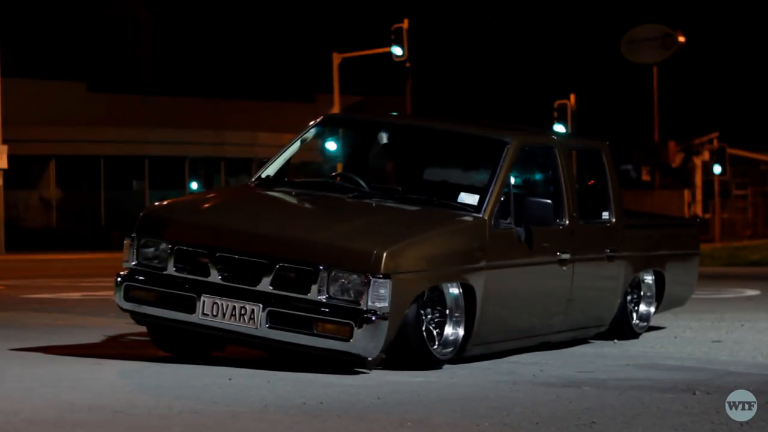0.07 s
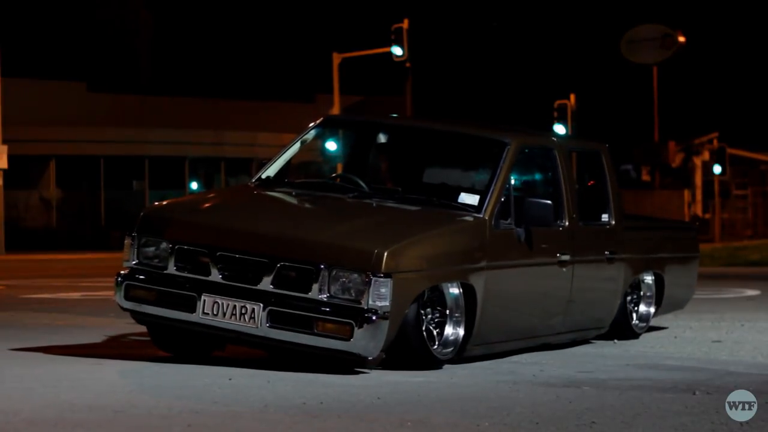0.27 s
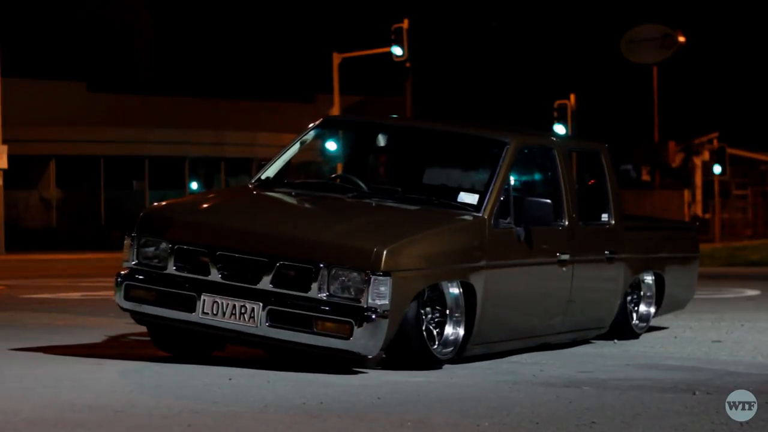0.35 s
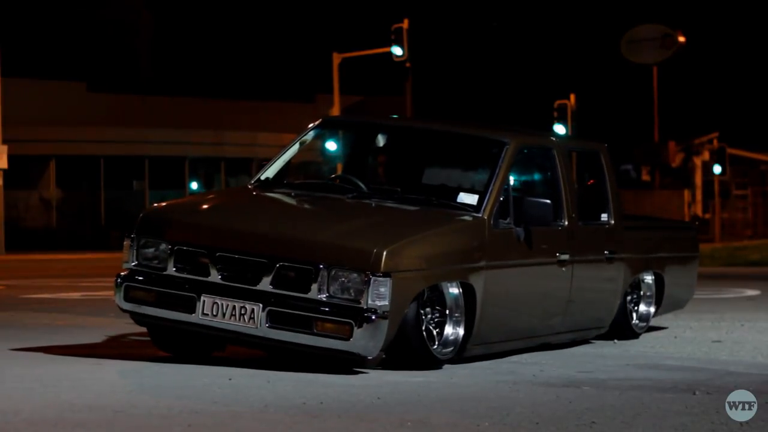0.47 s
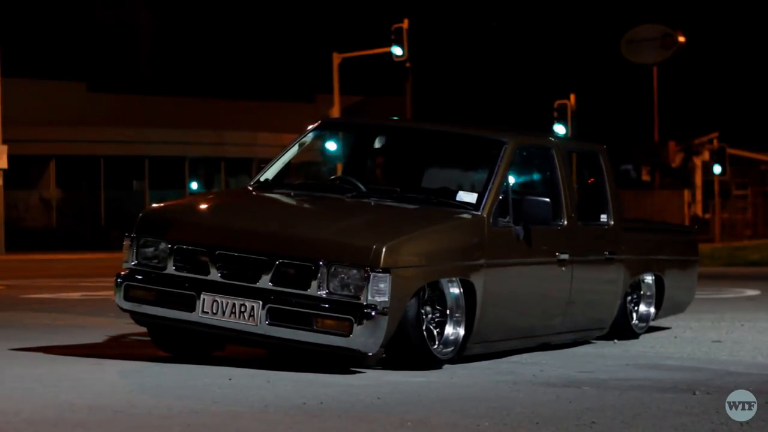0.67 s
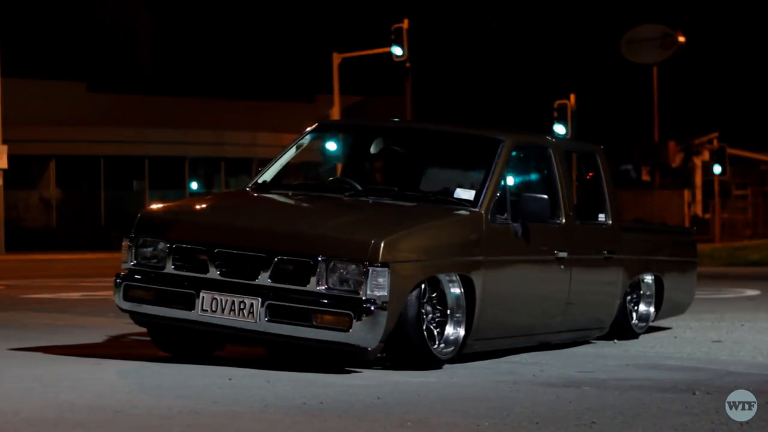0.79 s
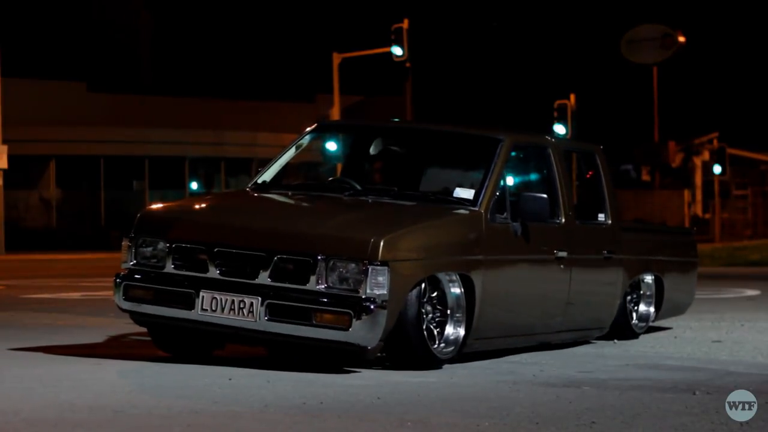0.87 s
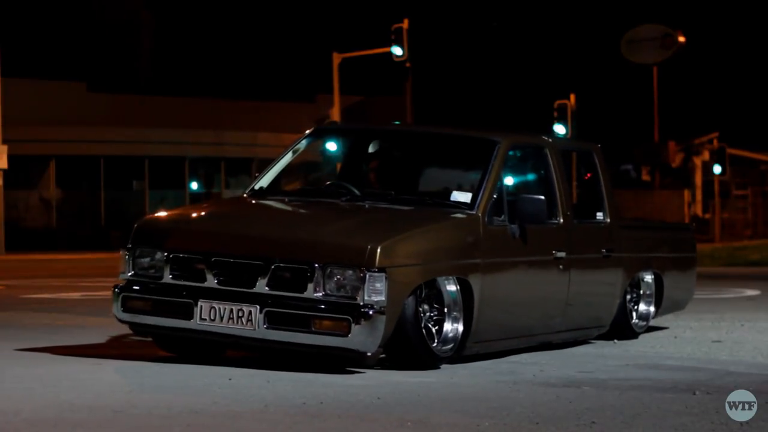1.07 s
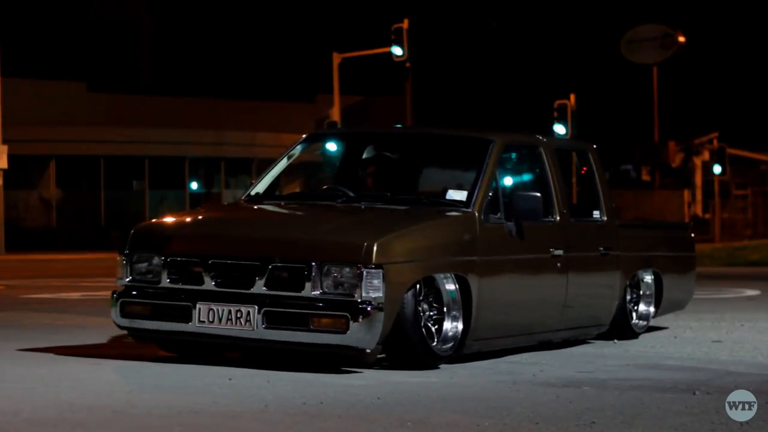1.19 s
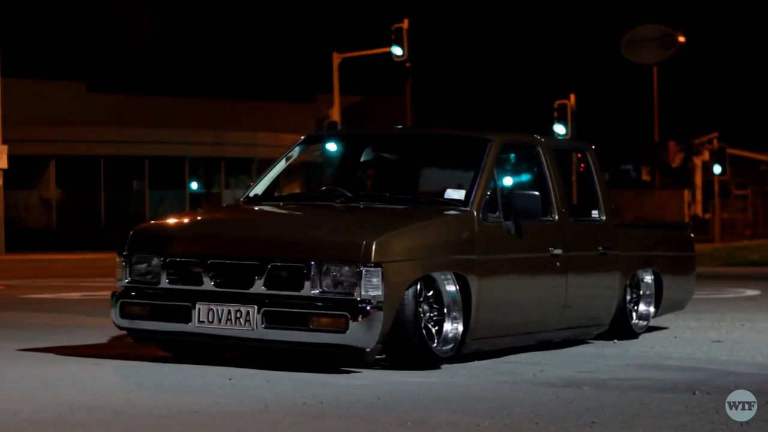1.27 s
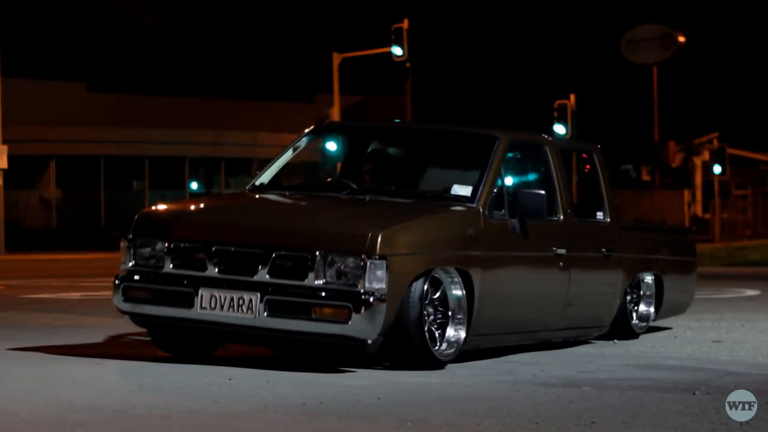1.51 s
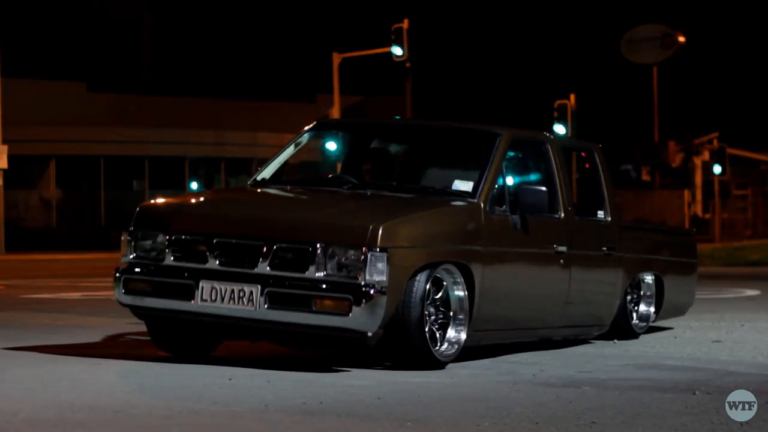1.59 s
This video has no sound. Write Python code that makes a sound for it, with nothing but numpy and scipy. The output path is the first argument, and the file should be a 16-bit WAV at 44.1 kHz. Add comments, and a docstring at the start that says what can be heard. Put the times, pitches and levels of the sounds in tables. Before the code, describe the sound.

Air hisses in separate bursts from a lowered truck's suspension on a quiet night street.

```python
"""A quiet street at night, one microphone near a lowered truck letting air out of its suspension.
Over a faint hum and a low rumble, the valve spits, then two muffled hisses and a lower gush come from
under the body, which knocks as it settles. About a second in, the valve pops into a bright jet and the
rumble drops away. The jet fades into an airy whistle and shuts, and a short puff ends it.
From farther off, the buildings throw the hiss back to the microphone."""
import sys
import numpy as np
from scipy import signal
from scipy.fft import rfft, irfft
from scipy.io import wavfile

SR = 44100
rng = np.random.default_rng(int(sys.argv[2]) if len(sys.argv) > 2 else 0)


def wrap_up_sound(samples):
    """Save the sound to the file named by the first command line argument, as 16-bit audio."""
    columns = np.atleast_2d(samples).T
    # keep every value between -1 and 1, then stretch to whole-number steps
    tamed = np.clip(columns, -1, 1)
    steps = np.round(tamed * 32767).astype(np.int16)
    wavfile.write(sys.argv[1], SR, steps)


N = 72765
T, HZ = np.arange(N) / SR, np.fft.rfftfreq(N, 1 / SR)

# Background noise of the street and the low rumble: (frequency [Hz], spectral level [dB])
STREET_SPECTRUM = [(30, -20), (200, -17), (450, -2.5), (700, 4), (1700, 3), (3000, -2), (5000, -9.5),
                   (8000, -20.5), (12000, -33), (16000, -29)]
RUMBLE_SPECTRUM = [(20, -15), (30, -21), (40, -27), (56, -7), (74, -7), (105, 6.5), (140, -2.5), (200, 2),
                   (420, -1.5), (600, -8), (1000, -15.5), (2500, -22), (6000, -28), (16000, -50)]
# How each swells and falls at the microphone: (time [s], level [dB])
STREET_LEVELS = [(0, -37.5), (.2, -46), (.5, -34), (.93, -32), (1.1, -39), (1.5, -46.5), (1.65, -45.5)]
RUMBLE_LEVELS = [(0, -39.5), (.064, -39.5), (.09, -32), (.2, -30.5), (.3, -33.5), (.52, -28), (.69, -29),
                 (.76, -25.5), (.89, -29.5), (.968, -24), (.988, -74), (1.12, -60), (1.2, -50.5),
                 (1.38, -49), (1.52, -44.5), (1.57, -38), (1.65, -39.5)]
# Hum inside the rumble: (frequency [Hz], level against the rumble [dB])
HUM_TONES = [(57, -12.5), (171, -17.5), (424, -13.5)]
# Tail from the buildings: (frequency [Hz], time to fall 60 dB [s])
ECHO_DECAY = [(200, 0.51), (2000, 0.41), (5000, 0.94), (9000, 0.8), (16000, 0.5)]
# Colour of the reflected sound: (frequency [Hz], gain [dB])
ECHO_EQ = [(100, -14), (1000, -1), (5500, 2), (9000, -0.5), (16000, -5)]
# Knocks of the settling body: (start [s], pitch [Hz], level [dB], rise [s], decay [s])
BODY_KNOCKS = [(0.084, 457, -25.5, 0.0097, 0.012), (0.224, 270, -11.5, 0.0091, 0.0075),
               (0.56, 400, -16, 0.0032, 0.0037), (.899, 750, -23.5, 0.0093, 0.0079)]
# Resonances, low and hollow, under the truck, and at the outlet: (frequency [Hz], width [Hz], gain [dB])
HOLLOW_PEAKS = [(167, 21, 2.5), (301, 36, 7.5), (424, 21, 7)]
CAVITY_PEAKS = [(1284, 15, 6.5), (1648, 19.4, 12.5), (2354, 15, -2), (2710, 88, 1), (4250, 37, 11.5),
                (4790, 45, 9), (5080, 210, 6), (7120, 68, 5), (8200, 150, -0.5)]
OUTLET_PEAKS = [(2485, 310, 6.5), (3240, 200, -0.5), (5390, 100, 5), (6200, 89, -1), (7000, 180, 6),
                (10400, 200, -1)]
# The two hisses: (start [s], length [s], level [dB], sag [dB/s], closing time [s], low-mid gain [dB])
MUFFLED_RELEASES = [(.221, 0.14, -16.5, -12.5, 0.016, -2), (.554, 0.24, -14.5, -38.5, 0.015, 1)]
# Valve and air heard from under the body: (frequency [Hz], spectral level [dB])
TICK_SPECTRUM = [(1000, 3), (4000, 0), (9000, -9), (16000, -14)]
SPIT_SPECTRUM = [(200, -8), (700, 10), (1500, 6.5), (2500, -1.5), (5000, -11.5), (9000, -32.5),
                 (16000, -36)]
RELEASE_SPECTRUM = [(150, -20), (400, -2.5), (950, -7.5), (1600, -1.5), (3100, 1.5), (4600, -6), (6100, -7),
                    (8000, -7), (9500, -9.5), (12000, -10.5), (13700, -10.5), (16000, -13.5)]
GUSH_SPECTRUM = [(100, -15), (400, 0.5), (780, -1), (1100, -5), (2500, -8), (5400, -7), (7000, -21),
                 (16000, -32)]
# Air heard in the open: (frequency [Hz], spectral level [dB])
PUFF_SPECTRUM = [(120, -24), (350, -12), (520, -3.5), (780, -13), (1600, 3), (2500, -2.5), (4400, 2),
                 (6600, -4.5), (8500, -2.5), (10500, -7), (13000, -3.5), (16000, -12)]
WHISTLE_SPECTRUM = [(2000, -47), (2900, -18), (3090, 0), (3220, -1), (3370, -1), (3650, -32), (5000, -47)]
BLAST_SPECTRUM = [(60, -9), (450, 0), (750, 5.5), (1600, 8.5), (3000, 2.5), (8000, 3), (16000, 1)]
FIZZ_SPECTRUM = [(500, -39), (2000, -10), (4500, -5.5), (7000, -0.5), (8800, -2.5), (10400, -2),
                 (13800, -14), (15700, -14)]
RUSH_SPECTRUM = [(100, -40), (250, -13.5), (450, -5), (800, -11), (1550, 1.5), (2100, -5), (3300, -6.5),
                 (4000, -2.5), (8000, -17), (16000, -10)]
# Ring of the valve's pop: (frequency [Hz], level [dB], time to fall 60 dB [s], delay [s])
POP_MODES = [(317, -15.5, 0.051, 0), (484, -11, 0.04, 0), (1385, -14, 0.07, .003),
             (1700, -5.5, 0.032, .005)]

JET_START_S, JET_LENGTH_S, JET_RISE_S, JET_CLOSE_S = 0.9605, 0.31, 0.0016, 0.012
LOW_MID_HZ, TREBLE_HZ = 2390, 5800


def amp(db):
    """Decibels to gain."""
    return 10 ** (np.asarray(db) / 20)


def unit(x):
    """Scales to rms 1."""
    return x / np.sqrt(np.mean(x ** 2) + 1e-20)


def read(points, hz):
    """Reads a curve on a log-frequency axis."""
    f, value = np.transpose(points)
    return np.interp(np.log(hz + 1), np.log(f + 1), value)


def level(points):
    """Gain over time from a level curve."""
    return amp(np.interp(T, *np.transpose(points)))


def drift(rate_hz):
    """Slow random wandering, rms 1."""
    return unit(irfft(rfft(rng.standard_normal(N)) * np.exp(-(HZ / rate_hz) ** 2), N))


def above(x, hz):
    """The part of a sound above a frequency."""
    return irfft(rfft(x) / (1 + (hz / (HZ + 1)) ** 6), N)


def turbulence(spectrum, peaks=(), ripple_db=0):
    """Noise at rms 1 with a broad colour, narrow resonances and the ripple of close reflections."""
    delays_s = rng.uniform(0.0007, 0.009, (24, 1))
    ripple = unit(np.cos(2 * np.pi * (delays_s * HZ + rng.random(delays_s.shape))).sum(0))
    peaks_db = sum(db / (1 + (2 * (HZ - hz) / width) ** 2) for hz, width, db in peaks)
    colour = amp(read(spectrum, HZ) + peaks_db + ripple_db * ripple)
    return unit(irfft(rfft(rng.standard_normal(N)) * colour, N))


def valve(start_s, length_s, rise_s, close_s, sag_db_per_s=0):
    """Flow through a valve: it opens smoothly, follows the pressure, and dies away on closing."""
    t = np.maximum(T - start_s, 0)
    opening = np.sin(np.pi / 2 * np.minimum(t / rise_s, 1)) ** 2
    closing = np.exp(-np.maximum(t - length_s, 0) / close_s)
    return opening * amp(sag_db_per_s * t) * closing


def street():
    """Far background: the dull wash of the night street and a faint steady hum."""
    hum = amp(-59.5) * unit(np.sin(2 * np.pi * 424 * T + 0.5 * drift(6.3)))
    wash = turbulence(STREET_SPECTRUM, HOLLOW_PEAKS, ripple_db=0.5)
    return wash * level(STREET_LEVELS) * amp(1.5 * drift(30)) + hum


def building_echo(x):
    """A diffuse tail from the buildings along the street; the hiss lingers longest near 5 kHz."""
    hz, t, noise = signal.stft(rng.standard_normal(SR), SR, nperseg=256)
    decay = np.exp(-np.log(1000) * t / read(ECHO_DECAY, hz)[:, None])
    tail = signal.istft(noise * decay, SR, nperseg=256)[1]
    wet = signal.fftconvolve(x, tail / np.linalg.norm(tail))[:N]
    return irfft(rfft(wet) * amp(read(ECHO_EQ, HZ)), N)


def wall_slap(x, delay_s=0.026):
    """One reflection off a wall, travelling about nine metres farther to the microphone."""
    colour = amp(-14 + read(ECHO_EQ, HZ))
    return irfft(rfft(x) * colour * np.exp(-2j * np.pi * HZ * delay_s), N)


def rumble():
    """A lumpy low rumble with a wavering hum, behind the hisses; it drops away as the jet opens."""
    hum = sum(amp(db) * unit(np.sin(2 * np.pi * hz * T + 1.07 * drift(13))) for hz, db in HUM_TONES)
    lumps = turbulence(RUMBLE_SPECTRUM, HOLLOW_PEAKS) * amp(0.72 * drift(29))
    return (lumps + hum) * level(RUMBLE_LEVELS)


def knocks(bend=0.188, bend_s=0.015):
    """Soft, hollow knocks as the body settles, each bending up in pitch."""
    out = np.zeros(N)
    for start, hz, db, rise, decay in BODY_KNOCKS:
        t = np.maximum(T - start, 0)
        pitch_hz = hz * (1 + bend * (1 - np.exp(-t / bend_s)))
        phase = 2 * np.pi * np.cumsum(pitch_hz) / SR + 0.17 * drift(150)
        tone = np.sin(phase) + amp(-10) * np.sin(1.5 * phase)
        out += amp(db) * valve(start, rise, rise, decay) * tone
    return out


def spit(start_s=0.1592):
    """The valve ticks and lets a little air by before the first release."""
    tick = turbulence(TICK_SPECTRUM) * amp(-33)
    tick *= valve(start_s, length_s=0.002, rise_s=0.002, close_s=0.005)
    air = turbulence(SPIT_SPECTRUM, CAVITY_PEAKS) * amp(-30.5)
    return tick + air * valve(start_s, length_s=0.012, rise_s=0.0022, close_s=0.049)


def gush():
    """A lower, rougher rush as the truck sinks, at the end of the second release."""
    air = turbulence(GUSH_SPECTRUM, HOLLOW_PEAKS + CAVITY_PEAKS) * amp(-21)
    sputter = amp(1.5 * drift(120))
    return air * sputter * valve(start_s=0.721, length_s=0.049, rise_s=0.0079, close_s=0.021)


def releases(dulling_db_per_s=-33.5):
    """Two hisses reach the microphone through the cavities under the truck; the treble fades first."""
    air = turbulence(RELEASE_SPECTRUM, CAVITY_PEAKS, ripple_db=1.0)
    low, top = air - above(air, LOW_MID_HZ), above(air, TREBLE_HZ)
    middle = air - low - top
    out = np.zeros(N)
    for start, length, db, sag, close, low_db in MUFFLED_RELEASES:
        dulling = amp(dulling_db_per_s * np.maximum(T - start, 0))
        hiss = low * amp(low_db) + middle + top * dulling
        out += hiss * amp(db) * valve(start, length, rise_s=0.023, close_s=close, sag_db_per_s=sag)
    sputter = amp(0.5 * drift(120))
    return out * sputter


def puff(start_s=1.335, length_s=0.039, rise_s=0.017):
    """One last short tap on the valve; the treble stops first."""
    air = turbulence(PUFF_SPECTRUM, ripple_db=1.4) * amp(-17.5)
    top = above(air, TREBLE_HZ)
    low = (air - top) * valve(start_s, length_s, rise_s, close_s=0.011)
    return low + top * valve(start_s, length_s, rise_s, close_s=0.007)


def whistle(start_s=1.03):
    """The outlet starts an airy singing as the pressure falls, until the valve shuts."""
    length_s = JET_START_S + JET_LENGTH_S - start_s
    flow = valve(start_s, length_s, rise_s=0.087, close_s=JET_CLOSE_S)
    return turbulence(WHISTLE_SPECTRUM) * amp(-31) * flow


def pop():
    """The valve snaps open and rings briefly."""
    out = np.zeros(N)
    for hz, db, t60, delay in POP_MODES:
        t = np.maximum(T - JET_START_S - delay, 0)
        out += amp(db) * 1e-3 ** (t / t60) * np.sin(2 * np.pi * hz * t)
    return out


def blast(close_s=0.0062):
    """The jet's first slug of air: a short low thump inside a slightly longer white burst."""
    air = turbulence(BLAST_SPECTRUM, ripple_db=5.0) * amp(-9.5)
    top = above(air, hz=2000)
    burst = top * valve(JET_START_S, length_s=0.019, rise_s=JET_RISE_S, close_s=close_s)
    thump = (air - top) * valve(JET_START_S, length_s=0.0083, rise_s=JET_RISE_S, close_s=close_s)
    return burst + thump


def jet():
    """In the foreground, a bright fizz fades with the pressure over a steadier rush."""
    fizz = turbulence(FIZZ_SPECTRUM, OUTLET_PEAKS, ripple_db=0.2) * amp(-13.5)
    fizz *= valve(JET_START_S, JET_LENGTH_S, JET_RISE_S, close_s=0.0073, sag_db_per_s=-70)
    rush = turbulence(RUSH_SPECTRUM, OUTLET_PEAKS, ripple_db=2.0) * amp(-27.5)
    rush *= valve(JET_START_S, JET_LENGTH_S, JET_RISE_S, JET_CLOSE_S, sag_db_per_s=5)  # swells slightly
    flutter = amp(0.5 * drift(71))
    return (fizz + rush) * flutter


def scene():
    """At the microphone: the muffled air carries more echo, the open jet sounds close and nearly dry."""
    muffled = spit() + releases() + gush()
    bright = blast() + jet() + whistle() + puff() + pop()
    echoes = wall_slap(bright) + building_echo(amp(-7) * muffled + amp(-23) * bright)
    return (muffled + bright + echoes + knocks() + rumble() + street())[None]


def record(dry):
    """The microphone's one channel clips at full scale, then rolls off at 15.9 kHz."""
    lowpass = signal.firwin(511, 15900, window=("kaiser", 8), fs=SR)
    return signal.oaconvolve(np.clip(dry, -1, 1), lowpass[None], "same")


dry = scene()
out = record(dry)
wrap_up_sound(out)
```